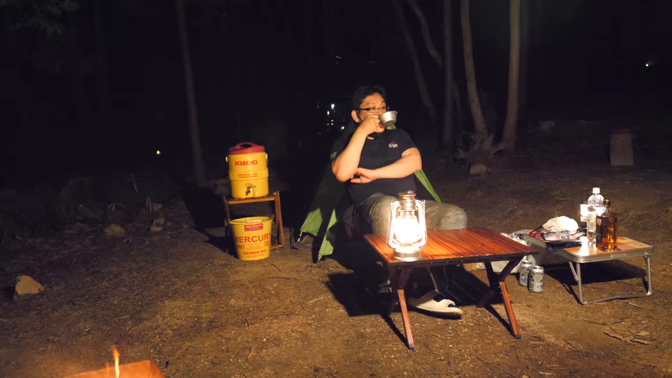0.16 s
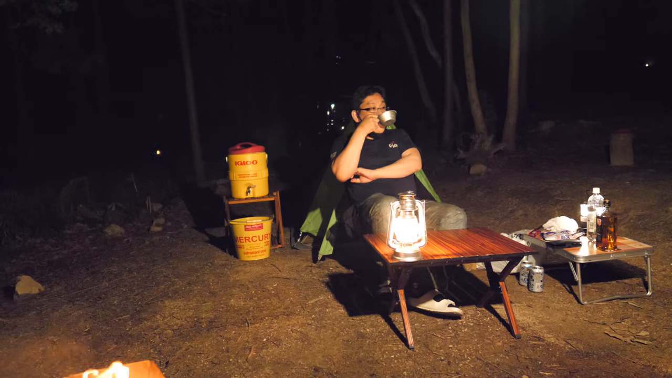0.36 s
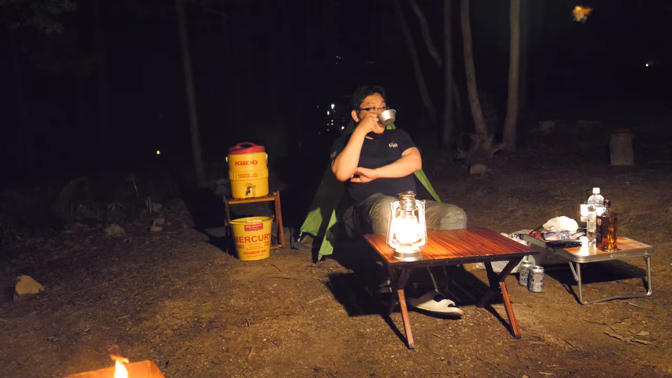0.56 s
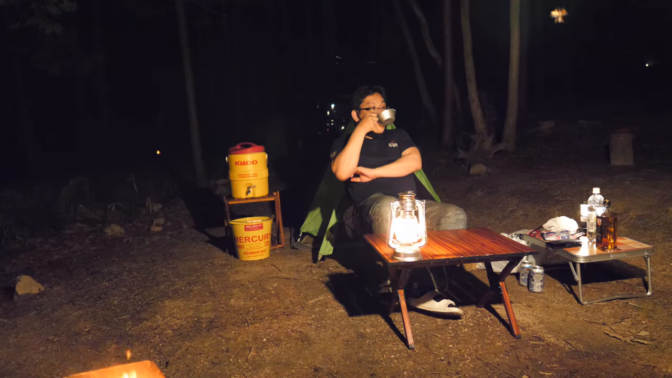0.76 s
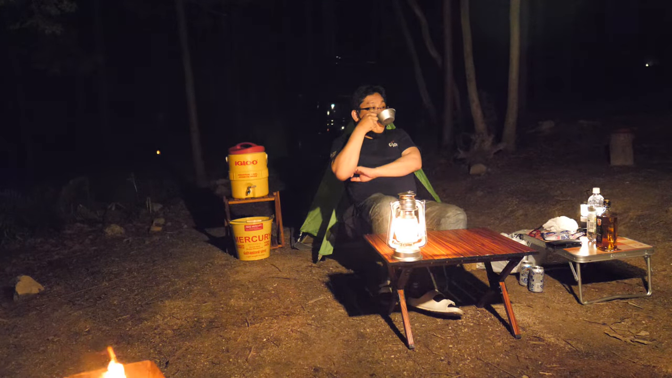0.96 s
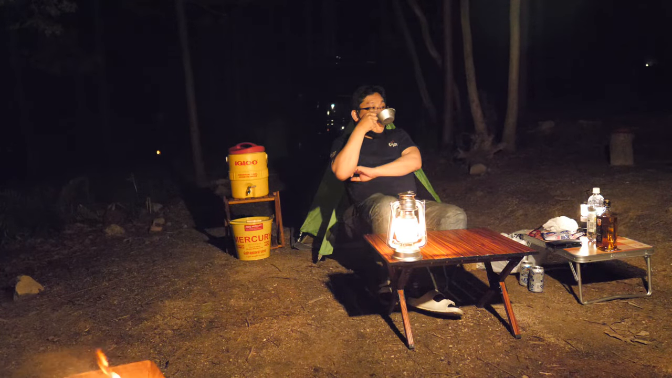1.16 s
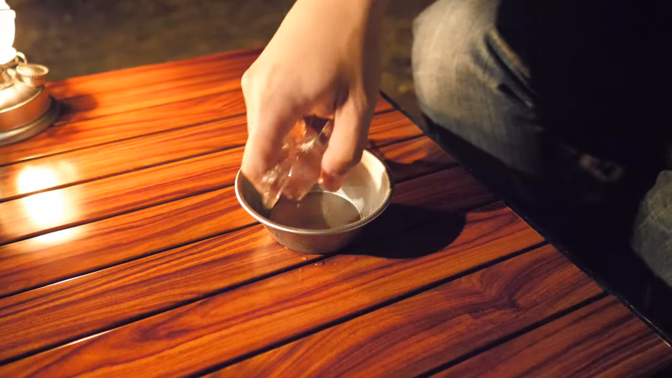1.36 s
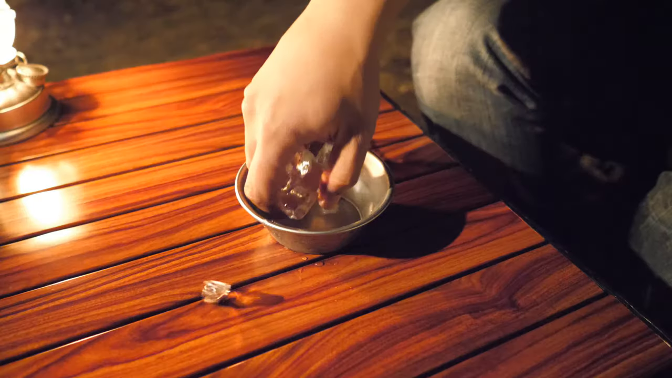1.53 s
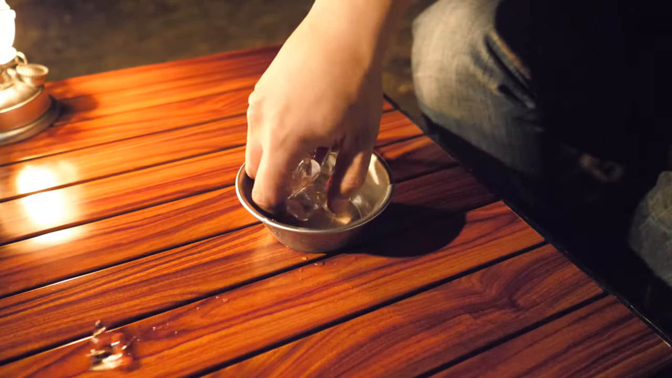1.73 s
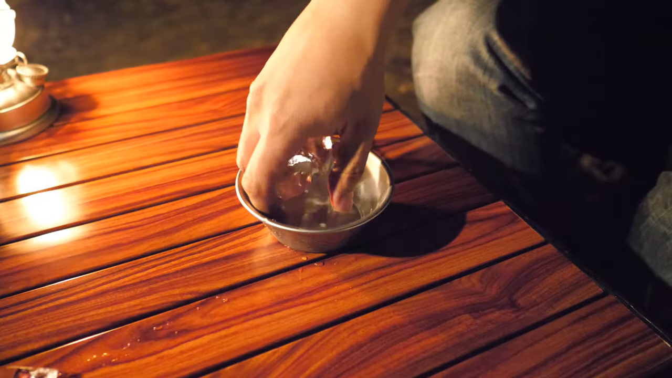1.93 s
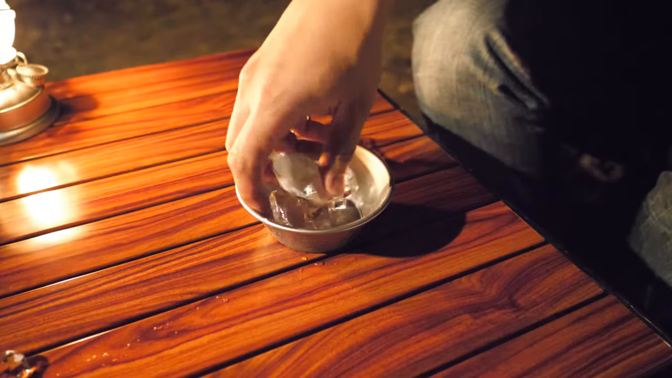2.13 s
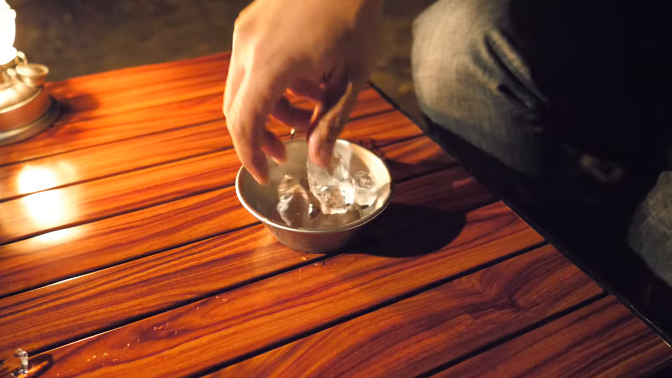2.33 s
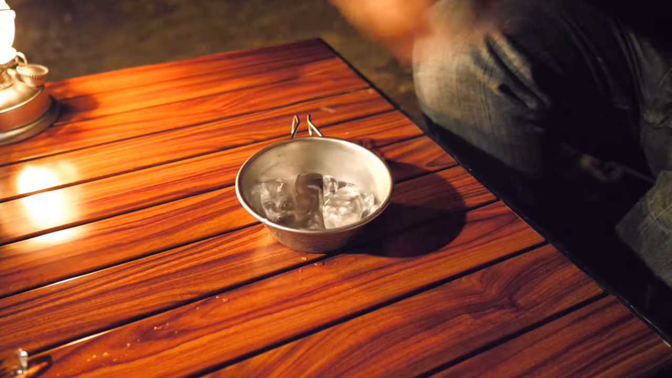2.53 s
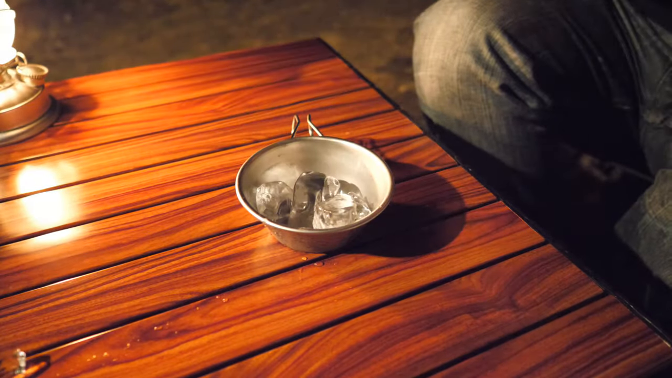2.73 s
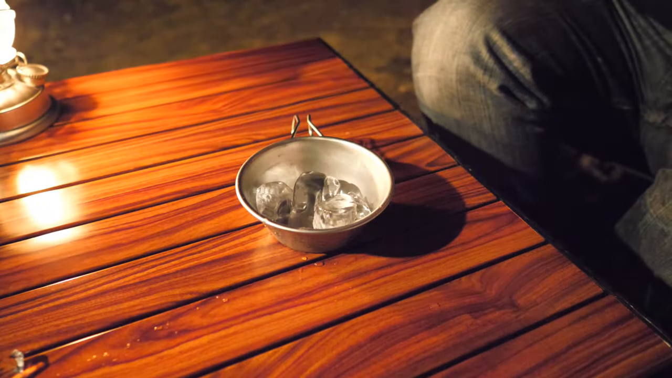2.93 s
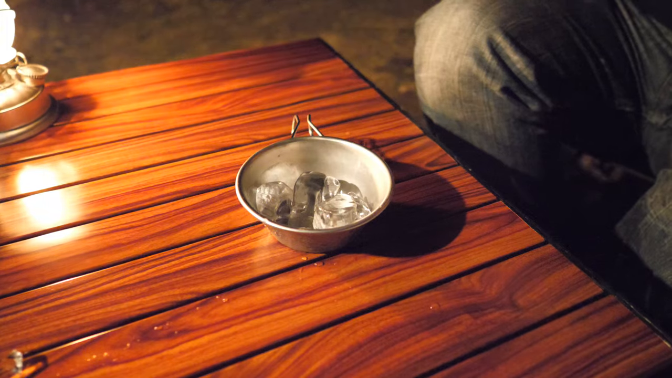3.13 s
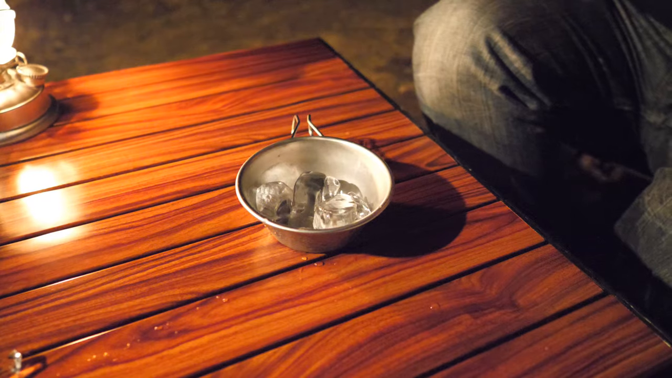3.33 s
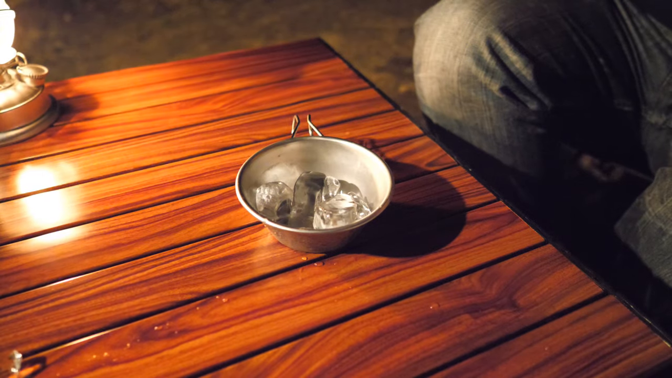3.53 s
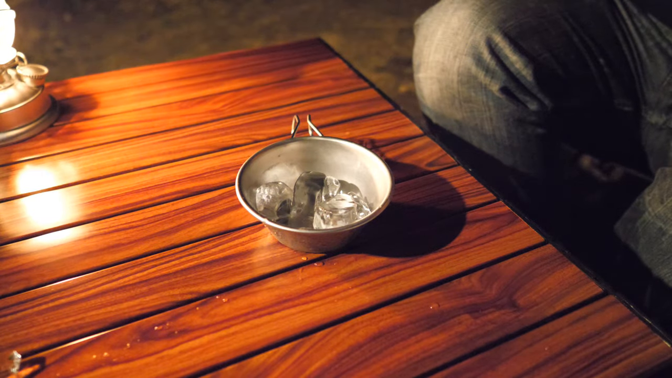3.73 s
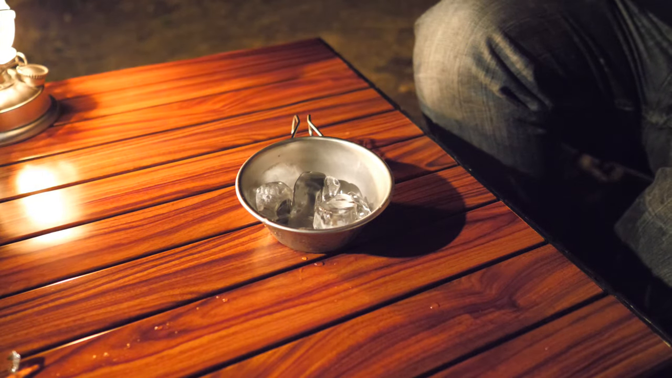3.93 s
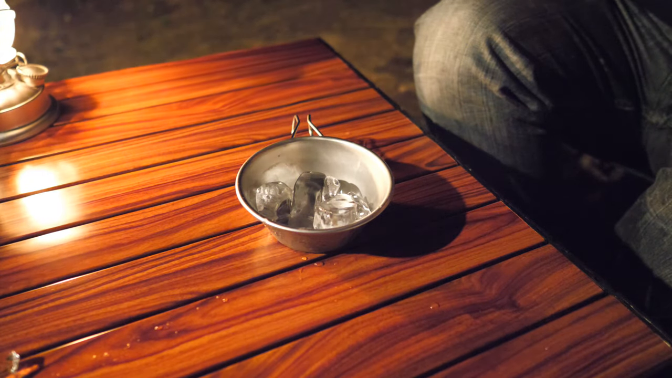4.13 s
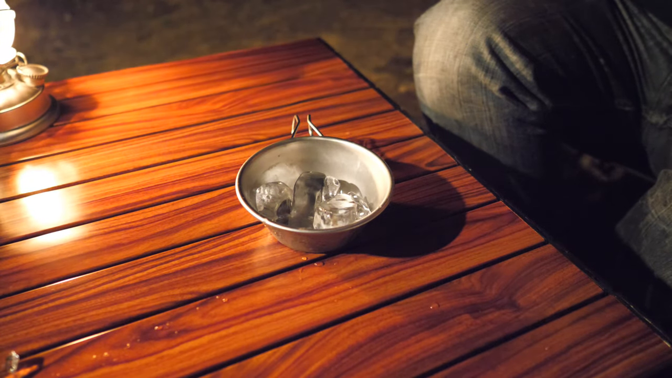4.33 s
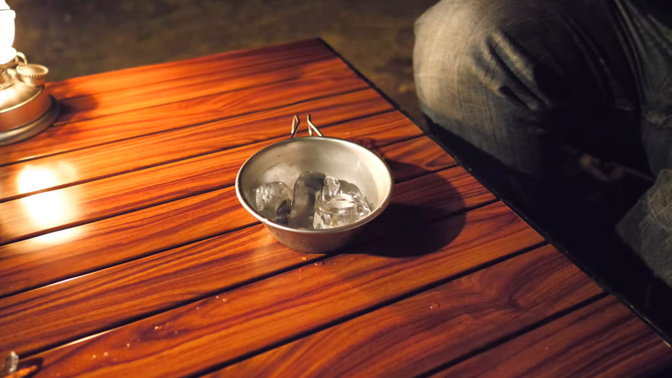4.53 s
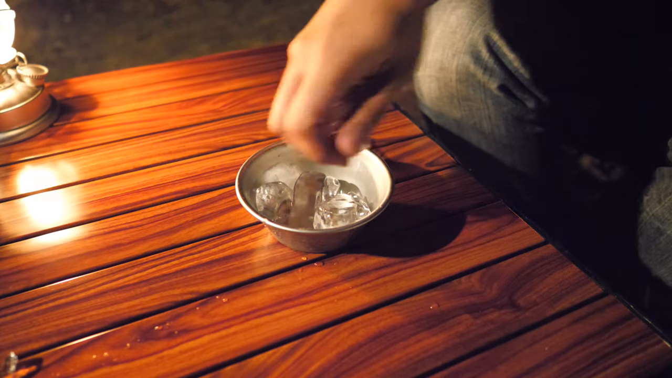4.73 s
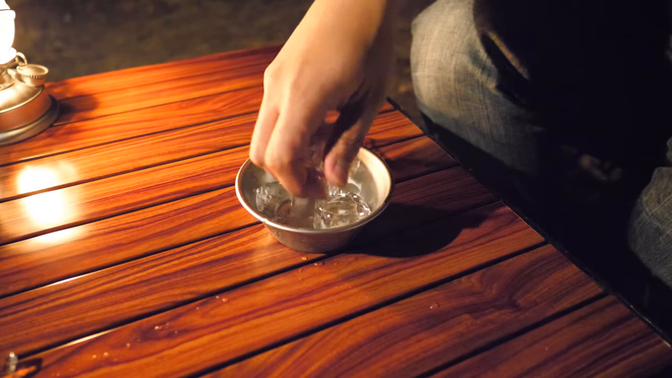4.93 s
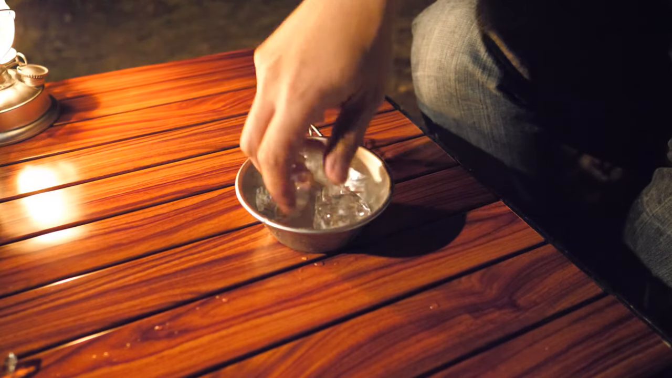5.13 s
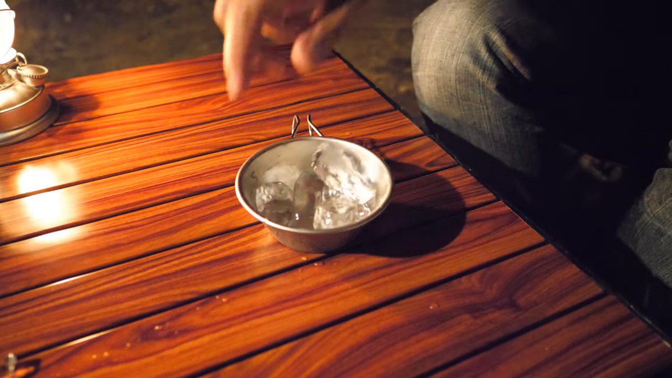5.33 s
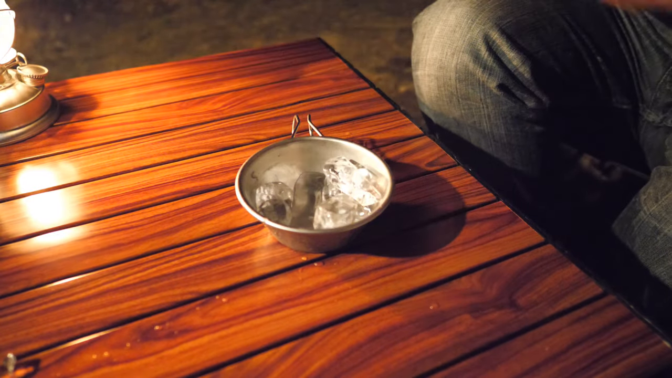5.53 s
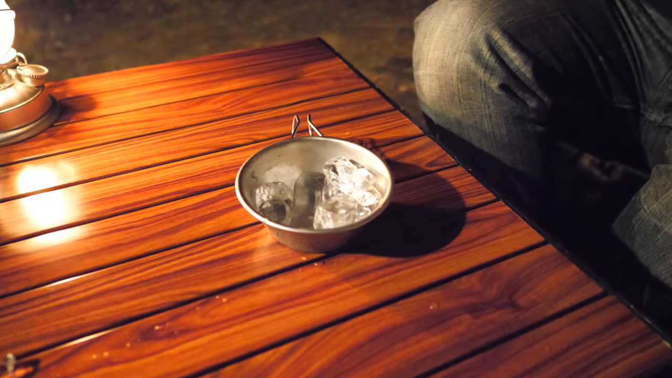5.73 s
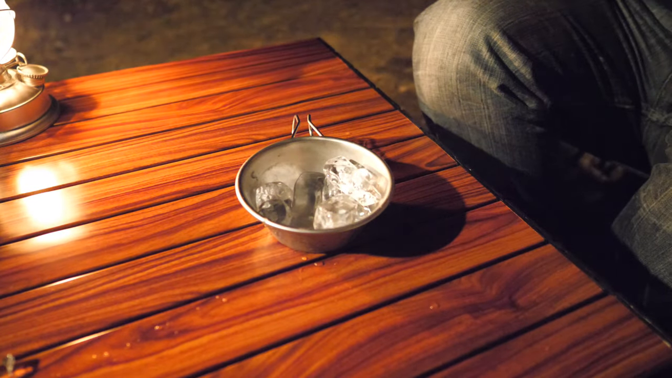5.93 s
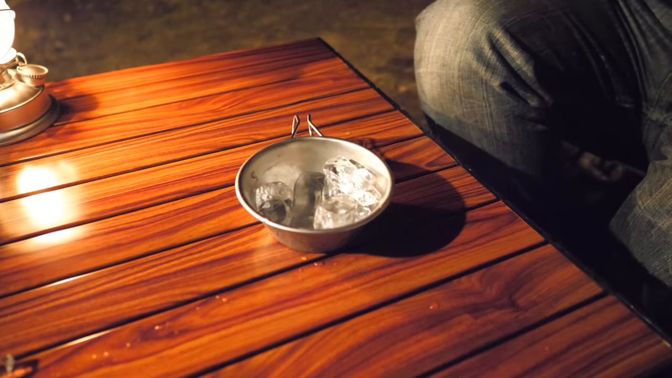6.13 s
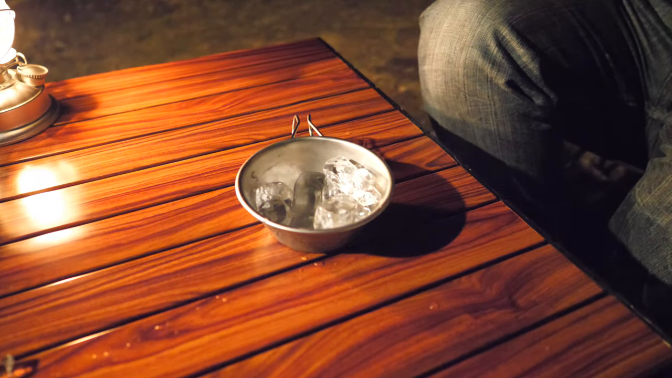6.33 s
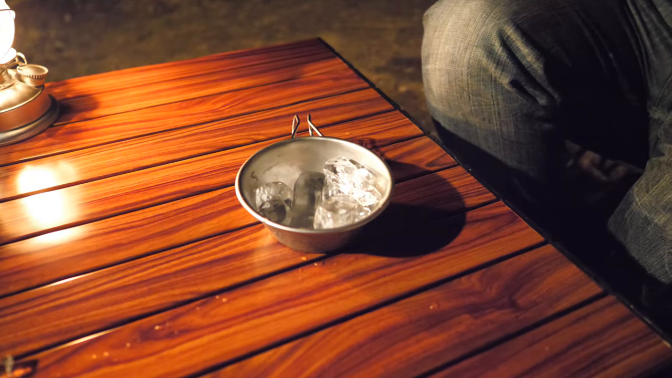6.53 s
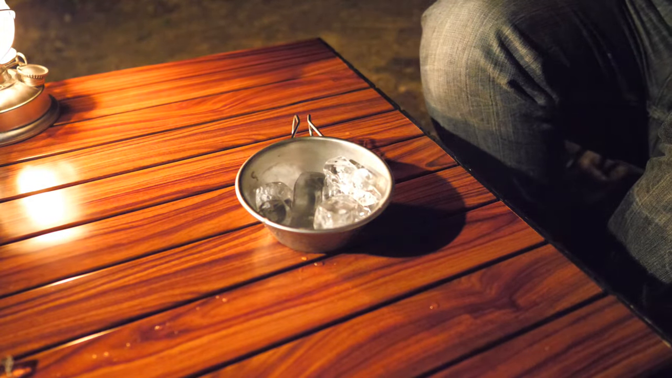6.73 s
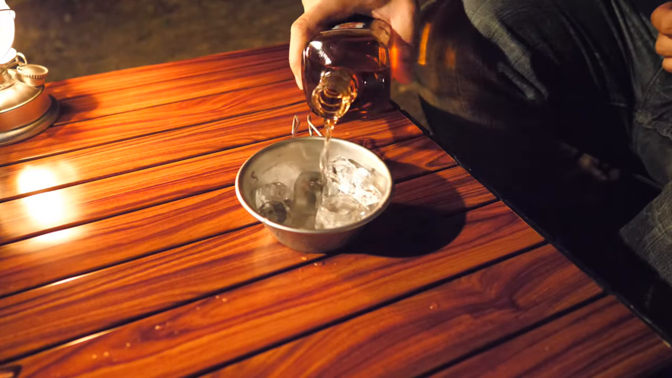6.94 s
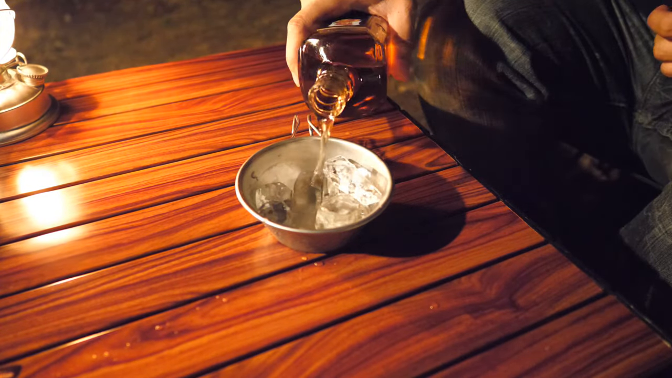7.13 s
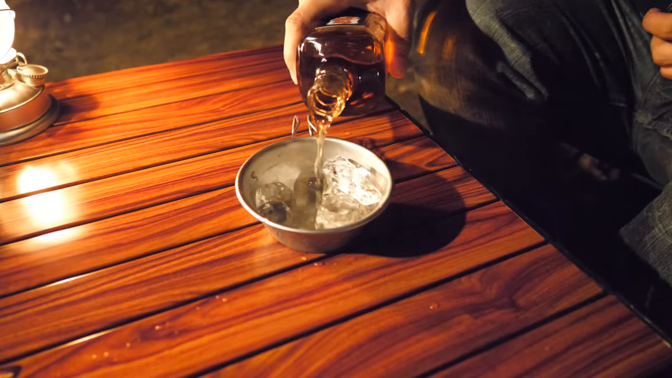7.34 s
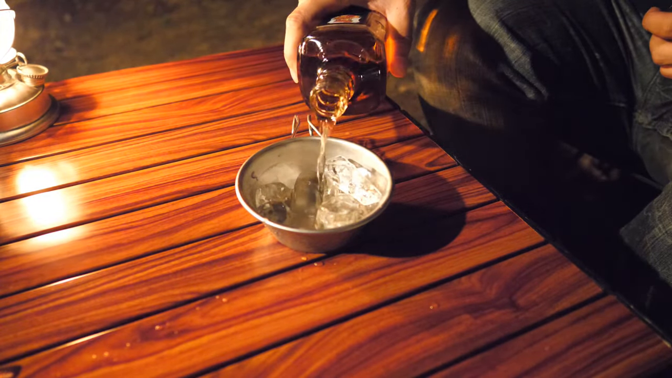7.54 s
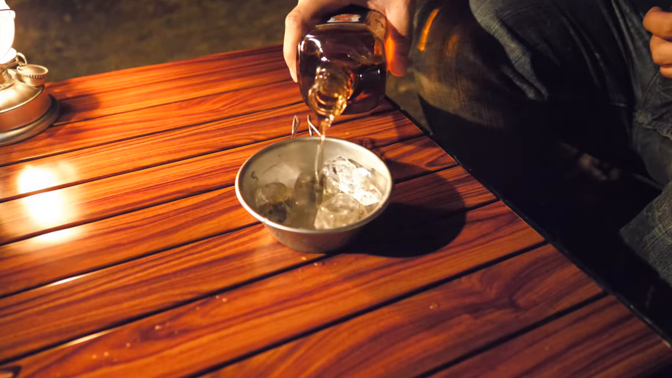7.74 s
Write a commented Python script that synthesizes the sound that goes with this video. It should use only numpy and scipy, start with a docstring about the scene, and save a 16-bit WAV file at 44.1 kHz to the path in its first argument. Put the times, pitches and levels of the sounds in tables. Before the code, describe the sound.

Ice cubes clang into a bare steel cup, knock and scrape together, then a plastic bag rustles, more ice drops, and faint drips plink at a quiet night camp.

```python
"""Camp in the woods at night: a hand drops ice cubes into a steel cup on a slatted wooden table and pushes them about.
The first cubes ring the bare cup (decaying modes); later ones knock, scrape and crack (noise bursts, grains, pings).
Between and after the handfuls a plastic ice bag rustles (grains and noise under hand strokes, snaps, gliding swishes).
Last a drink drips on the ice (pings). A campfire ticks faintly over steady hiss and low rumble (coloured noise)."""
import sys
import numpy as np
from scipy import signal
from scipy.fft import rfft, irfft, next_fast_len
from scipy.io import wavfile
from scipy.ndimage import uniform_filter1d, map_coordinates

SR = 44100
rng = np.random.default_rng(int(sys.argv[2]) if len(sys.argv) > 2 else 0)


def file_out(sig):
    """Save sig as 16-bit WAV at sys.argv[1]."""
    # one column per channel
    cols = np.atleast_2d(sig).T
    # limit, then scale
    lim = np.clip(cols, -1, 1)
    pcm = np.round(lim * 32767).astype(np.int16)
    wavfile.write(sys.argv[1], SR, pcm)


N = 343098
TIME_S = np.arange(N) / SR

# cube lands or is knocked: (time [s], force [dB], hardness as treble over bass [dB], cup ring over force [dB])
KNOCKS = [(1.4182, -12.5, 4.5, -5.5), (1.4534, -13.5, 27.5, 0), (1.5239, -6, 7, -5.5),
          (1.5393, -21.5, 8, 5.5), (1.6314, -18.5, -2, 2.5), (1.66, -18, -5, 1), (1.7005, -14.5, -8.5, -7),
          (1.7636, -34, -20.5, 5), (1.8244, -32.5, -18.5, -4), (1.8578, -28, -17, -10),
          (1.8838, -20.5, -17, -16), (1.9367, -9, -6.5, -20), (1.9683, -13, -10, -17),
          (1.9728, -12, -1, -37), (1.9907, -19.5, -9, -13), (2.0039, -16, -8, -24), (2.1126, -27, -13, 2.5),
          (2.121, -4.5, 4, -12), (2.164, -19.5, -8, -13), (2.2207, -24, -2, -30), (2.2674, -24.5, -14, -51),
          (2.292, -19.5, -11, -5), (2.3107, -17, 12, -3), (2.3199, -17, -14.5, -7),
          (2.3553, -20.5, -9, -19), (2.39, -42, -26, -18), (2.415, -17.5, 8, -3), (2.4258, -17.5, 10, -3),
          (2.4348, -7, -7.5, -35), (2.4602, -21.5, -9, -0.5), (2.496, -20.5, 17, -0.5),
          (2.5195, -8.5, -4, -7), (2.5391, -18.5, 17, -7), (2.576, -18, -5, -5), (2.599, -27, -9, -22),
          (5.013, -39.5, -17, -33), (5.0663, -7.5, 1.5, -29), (5.0826, -24.5, -10, -7),
          (5.1522, -24, -15, -6), (5.164, -21, -8, -10), (5.1762, -4.5, 1, -21), (5.1867, -12.5, 5, -9.5),
          (5.2044, -12.5, -6, -13), (5.2487, -11.5, 10, -13), (5.258, -9, 15, -8), (5.3064, -20, 5, -6),
          (5.317, -14.5, 18, -21), (5.336, -24.5, -10, -24), (5.358, -16, -8, -48), (5.362, -24, -3, -47),
          (5.3932, -20, -4, 5.5), (5.3978, -7.5, 12, -9), (5.4805, -16.5, 13, -17), (5.507, -36.5, -15, -6)]
# cup modes: (frequency [Hz], unloaded t60 [s], level struck on rim [dB], on bare base [dB],
# on wall with ice inside [dB], when heaped with ice [dB])
CUP_MODES = [(294, 0.11, -36, -27, -34, -33), (653, 0.16, -19, -1, -9, -33), (698, 0.14, -28, -10, -6, -20),
             (1110, 0.26, -6, -5, -11, -9), (1253, 0.29, -4, -6, -35, -30),
             (1570, 0.18, -25, 8.5, -24, -24), (1733, 0.081, -27, -3, 2.5, -12),
             (2160, 0.24, -6, -9, -3, 12), (2353, 0.081, -33, -30, 1, 9.5), (2690, 0.13, -23, -7, -31, -14),
             (2870, 0.14, -26, 1.5, -6, -17), (2940, 0.31, -8, -10, -36, -1),
             (3860, 0.38, -18, -32, -5.5, -18), (4600, 0.21, 9, 1.5, -6, -14),
             (5100, 0.22, -14, -3, -25, 9.5), (5459, 0.29, -1, -28, -14, -15),
             (6520, 0.087, 15, -26, -21, -22), (7000, 0.22, -13, -21, -8, -20),
             (7000, 0.2, -25, -21, -33, -26), (8100, 0.052, 18, -16, -10, -25),
             (10760, 0.045, 5, -33, -2, -29)]
# cup fills up: start of blows on the base, on the wall, on the heap (time [s])
FILLING = [1.5, 1.8, 4.0]
# colour of a blow on cup and table: (frequency [Hz], density [dB per Hz])
BODY = [(120, -33), (190, -27), (270, -2), (480, -8.5), (640, -0.5), (870, 1), (1000, -6), (1700, -3.5),
        (2600, -8), (4600, -8.5), (6000, -11), (7600, -9), (10000, -16), (11800, -12.5), (15500, -19.5)]
# cubes are shoved, rock and scrape: (time [s], length [s], rocking [dB], scraping [dB])
SHOVES = [(1.667, 0.081, -26.5, -32), (1.753, 0.035, -32, -69.5), (1.891, 0.035, -19.5, -39),
          (1.948, 0.072, -22, -43), (2.056, 0.05, -34.5, -68), (2.129, 0.026, -32, -18.5),
          (2.316, 0.022, -21, -21.5), (2.41, 0.052, -33, -37), (2.479, 0.11, -30.5, -26),
          (5.131, 0.035, -31, -45), (5.179, .04, -21.5, -27), (5.442, .02, -33, -54)]
# warming ice splits: (time [s], level [dB], frequency [Hz])
CRACKS = [(2.0541, -10.5, 3180), (2.097, -35, 3270), (2.1069, -19.5, 3340), (2.2188, -15.5, 3340),
          (2.6891, -10, 3680), (4.9788, -22, 3500)]
# hand grips the bag: (time [s], length [s], level [dB], brightness [dB])
GRIPS = [(2.705, 0.13, -31, -4), (2.796, 0.12, -32, 0), (2.969, 0.098, -32.5, -1.5),
         (3.089, 0.15, -34, 0.5), (3.242, 0.2, -29.5, -1.5), (3.45, 0.1, -35, -3.5),
         (3.529, .35, -33, -3.5), (3.894, 0.23, -35, -2.5), (4.112, 0.26, -35, -0.5),
         (5.717, 0.21, -36.5, -14.5), (5.964, 0.097, -32.5, -15.5), (6.06, 0.54, -39.5, -12.5),
         (6.386, .1, -26, -2), (6.606, 0.2, -33.5, -4)]
# bag creases snap: (time [s], level [dB], brightness [dB])
SNAPS = [(2.7747, -22, 4), (2.8087, -24, 0), (2.8476, -25, 5), (2.913, -22.5, 8), (2.931, -27, 7),
         (2.9595, -28.5, 7), (3.0494, -15, -0.5), (3.1657, -23.5, -4), (3.236, -25, 6), (3.3213, -15, 19),
         (3.4176, -30.5, -13.5), (3.5446, -28, 16), (3.6011, -24.5, 1), (3.756, -21, 14.5),
         (4.0153, -23, 5), (4.0759, -35, -17), (5.7498, -21.5, 2), (5.798, -24.5, 0), (5.911, -18, -7),
         (5.985, -22.5, -0.5), (6.2336, -25.5, -2), (6.401, -24.5, 17), (6.4086, -25, -11.5),
         (6.5227, -20, 4), (6.5392, -21.5, -4.5), (6.6221, -22.5, 1), (6.7279, -27, 28.5),
         (6.7686, -24.5, -7.5)]
# film drawn over wet ice: (time [s], length [s], first frequency [Hz], last frequency [Hz], level [dB])
SWISHES = [(3.567, 0.063, 5220, 4230, -26.5), (3.653, .08, 2820, 2050, -29.5),
           (6.623, 0.17, 2290, 4680, -33.5)]
# colour of the plastic film: (frequency [Hz], density [dB per Hz])
FILM = [(88, -44), (150, 5.5), (534, -4.5), (649, -4.5), (941, 0.5), (1600, 1), (4760, -5), (6770, -16),
        (7920, -15), (13400, -21.5), (16000, -22)]
# poured drink plinks on the ice: (time [s], level [dB], frequency [Hz])
DRIPS = [(7.6496, -32, 3380), (7.6785, -24, 3430), (7.679, -32, 5060), (7.7656, -29.5, 1870)]
# fire ticks: (time [s], level [dB], frequency [Hz])
FIRE_TICKS = [(0.8859, -32.5, 5360), (7.0342, -41.5, 6650), (7.4273, -43, 8250), (7.6181, -44, 9100),
              (7.7114, -44, 8160)]
# colour of the flames: (frequency [Hz], density [dB per Hz])
FLAMES = [(300, -15.5), (600, -1), (850, -4), (1200, -9), (7000, -41), (8700, -20.5), (10000, -57)]
# colour of the woods' hiss: (frequency [Hz], density [dB per Hz])
WOODS = [(100, 0.5), (250, -3), (380, -6.5), (700, -4), (2600, -5), (3200, -2), (3900, -7.5), (7000, -20.5),
         (11600, -29), (16000, -34)]
# low rumble: (time [s], level [dB])
RUMBLE = [(0.0, -62), (0.06, -46), (1.28, -48.5), (1.34, -40), (1.6, -50), (1.65, -45), (4.79, -50.5),
          (5.55, -55), (6.2, -41.5), (6.78, -55), (6.85, -41), (7.04, -50.5), (7.71, -44), (7.78, -56)]
# brief dropouts: (start [s], end [s])
DIPS = [(1.205, 1.219), (6.807, 6.822)]

HEAP_CLINK_DB, HEAP_CUSHION_DB = 4.5, 2.5  # ice on ice: more clink, less thud
# tail level: base, then dB per dB; ringing steel dies slowly, weak blows chatter, hard ones bounce clear
TAIL_DB, TAIL_PER_RING, TAIL_PER_FORCE, TAIL_PER_HARDNESS = -12, 0.66, -0.79, -0.2
DAMPED_HZ, DAMPED_T60_S = 5000, 0.12  # the extra damping alone gives this t60 at this frequency
HISS_DB, FLAMES_DB, FLAMES_END_S = -41.5, -45.5, 1.21
BUMP_S, BUMP_DB = 6.84, -40.5
GAIN_THRESHOLD_DB, GAIN_SLOPE = -14.5, 0.5  # slope: dB of gain cut per dB over threshold
HELD_LEVEL_FALL_DB_PER_S = 25
CLIP_LEVEL, TOP_HZ, SKIRT_HZ = 1.05, 15900, 600


def amp(db):
    """Decibels to gain."""
    return 10 ** (np.asarray(db) / 20)


def unit(x):
    """Scale to rms 1."""
    return x / np.sqrt(np.mean(x ** 2) + 1e-20)


def colour(points, hz):
    """Gain of (Hz, dB) points, interpolated on a log frequency axis."""
    points_hz, db = np.transpose(points)
    return amp(np.interp(np.log(hz + 1), np.log(points_hz), db))


def band(hz, lo_hz, hi_hz):
    """Gain of a steep band-pass."""
    return 1 / np.sqrt((1 + (lo_hz / (hz + 1)) ** 10) * (1 + (hz / hi_hz) ** 10))


def filtered(x, points, lo_hz, hi_hz):
    """Colour a sound within a band, rms 1."""
    m = next_fast_len(len(x))
    hz = np.fft.rfftfreq(m, 1 / SR)
    spectrum = rfft(x, m) * colour(points, hz) * band(hz, lo_hz, hi_hz)
    return unit(irfft(spectrum, m)[:len(x)])


def noise(points, lo_hz, hi_hz, size=N):
    """Coloured noise of rms 1 within a band."""
    return filtered(rng.standard_normal(size), points, lo_hz, hi_hz)


def wobble(knots_per_s):
    """Smooth random curve."""
    knots = rng.standard_normal(int(N * knots_per_s / SR) + 4)
    return map_coordinates(knots, [TIME_S * knots_per_s])


def fade(t, t60):
    """Free exponential decay, 60 dB in t60."""
    return np.exp(-np.log(1000) * t / t60)


def add(out, s, sound):
    """Mix a sound in at a time."""
    part = out[max(round(s * SR), 0):][:len(sound)]
    part += sound[:len(part)]


def burst(points, lo_hz, hi_hz, t60, tail_db, tail_t60):
    """Blow on densely packed modes: noise with a sharp front and a tail, rms 1 over the first 5 ms."""
    t = np.arange(SR // 5) / SR
    decay = fade(t, t60) + amp(tail_db) * fade(t, tail_t60)
    onset = 1 - np.exp(-t * hi_hz * 2)
    x = noise(points, lo_hz, hi_hz, size=len(t)) * decay * onset
    return x / np.sqrt(np.mean(x[:SR // 200] ** 2))


def grains(rate, lo_hz, hi_hz, cycles, spread_db):
    """Many tiny contacts (rate per second), each ringing a few cycles at its own pitch; rms 1."""
    when, pitch, size, sign = rng.random((int(rate * N / SR), 4)).T[:, :, None]
    hz = lo_hz * (hi_hz / lo_hz) ** pitch
    n = np.arange(SR // 100)
    size_db = spread_db * np.minimum(-np.log(1 - size), np.pi)
    strength = amp(size_db) * np.sign(sign - 0.5) * hz
    ring = strength * np.sin(2 * np.pi * hz * n / SR) * fade(n / SR, cycles / hz)
    position = (when * N).astype(int) + n
    return unit(np.bincount(position.ravel(), ring.ravel(), N)[:N])


def stroke(s, length, attack_s, sag_db_per_s, release_t60):
    """Envelope of a hand movement: takes hold, drifts in strength, lets go."""
    t = np.maximum(TIME_S - s, 0)
    hold = np.minimum(t / attack_s, 1) * amp(-sag_db_per_s * t)
    return hold * fade(np.maximum(t - length, 0), release_t60)


def pings(rows, t60, spray_db, tail_db):
    """Each event rings one tone for a few cycles, with a spray of treble."""
    out, t = np.zeros(N), np.arange(SR // 5) / SR
    for s, db, hz in rows:
        tone = np.sin(2 * np.pi * hz * t) * fade(t, t60) * (1 - np.exp(-t * hz))
        tone /= np.sqrt(np.mean(tone[:3 * SR // 1000] ** 2))
        spray = burst(BODY, hz / 2, 16000, t60=0.0048, tail_db=tail_db, tail_t60=0.04)
        add(out, s, amp(db) * (tone + amp(spray_db) * spray))
    return out


def small(x, corner_hz):
    """Small things radiate little bass."""
    return signal.sosfilt(signal.butter(2, corner_hz, "highpass", fs=SR, output="sos"), x)


def knocks():
    """Contacts thump table, clack cup, snap in ice; lower fronts last longer, harder blows are brighter."""
    out = np.zeros(N)
    for s, db, hard_db, ring_db in KNOCKS:
        heaped = s > FILLING[-1]
        tail_db = TAIL_DB + TAIL_PER_RING * ring_db + TAIL_PER_FORCE * db + TAIL_PER_HARDNESS * hard_db
        thud_db = db - 0.54 * hard_db - heaped * HEAP_CUSHION_DB - 5
        clack_db = db - 0.28 * hard_db - 6.5
        clink_db = db + 0.13 * hard_db - 0.11 * ring_db + heaped * HEAP_CLINK_DB - 5
        crack_db = db + 0.49 * hard_db + 0.38 * ring_db - 3.5
        thud = burst(BODY, 220, 1540, t60=0.047, tail_db=tail_db - 1.5, tail_t60=0.15)
        clack = burst(BODY, 1340, 2740, t60=0.022, tail_db=tail_db - 1, tail_t60=0.14)
        clink = burst(BODY, 2190, 4800, t60=0.011, tail_db=tail_db - 3, tail_t60=0.089)
        crack = burst(BODY, 5300, 19000, t60=0.011, tail_db=tail_db + 7, tail_t60=0.068)
        add(out, s, amp(thud_db) * thud)
        add(out, s, amp(clack_db) * clack)
        add(out, s, amp(clink_db) * clink)
        add(out, s, amp(crack_db) * crack)
    return out


def cup_ring(scatter_db, ring_db):
    """Where a cube lands decides which modes of the steel sound."""
    out, t = np.zeros(N), np.arange(SR // 3) / SR
    hz, t60, *places = np.transpose(CUP_MODES)
    for s, db, _, steel_db in KNOCKS:
        place = np.searchsorted(FILLING, s)
        loaded = place > 1
        size = amp(places[place] + scatter_db * rng.standard_normal(len(hz)))
        size /= np.linalg.norm(size)
        # once the cup is loaded, high modes are damped most and all detune a little from blow to blow
        pitch = hz * (1 + 0.0062 * loaded * rng.standard_normal(len(hz)))
        life = 1 / (1 / t60 + loaded * (hz / DAMPED_HZ) ** 2 / DAMPED_T60_S)
        phase = 2 * np.pi * (pitch[:, None] * t + rng.random((len(hz), 1)))
        # the handle spoils the symmetry: each mode has a weaker twin that beats with it
        detune = 1 + 0.0102 * rng.standard_normal((len(hz), 1))
        twin = np.sin(phase * detune) / 2
        modes = (np.sin(phase) + twin) * fade(t, life[:, None])
        add(out, s, amp(db + steel_db + ring_db) * size @ modes)
    return out


def cube_ring(cube_db, t60, lo_hz, hi_hz):
    """No two cubes alike: each contact briefly rings 8 random modes, the high ones more on a hard blow."""
    out, t = np.zeros(N), np.arange(SR // 8) / SR
    for s, db, hard_db, _ in KNOCKS:
        height, phase = rng.random((2, 8, 1))
        hz = lo_hz * (hi_hz / lo_hz) ** height
        size = amp(db + cube_db - 5.5 * height + 0.7 * hard_db * (height - 0.5))
        modes = size * np.sin(2 * np.pi * (hz * t + phase)) * fade(t, t60)
        add(out, s, np.sum(modes, axis=0))
    return out


def jostle(clatter_db, grit_db, table_db):
    """Shoved cubes rock in runs of small knocks, their edges scrape, the table murmurs under the load."""
    rocking, scraping = np.zeros((2, N))
    for s, length, rock_db, scrape_db in SHOVES:
        push = stroke(s, length, attack_s=0.0051, sag_db_per_s=13, release_t60=0.048)
        rocking += amp(rock_db) * push
        scraping += amp(scrape_db) * push
    rocks = grains(rate=600, lo_hz=610, hi_hz=2880, cycles=18, spread_db=1.5)
    edges = grains(rate=690, lo_hz=2460, hi_hz=15000, cycles=10, spread_db=-4.5)
    clatter = amp(clatter_db) * filtered(rocks, BODY, 220, 3300)
    grit = amp(grit_db) * filtered(edges, BODY, 2500, 18000)
    table = amp(table_db) * noise([(85, 6), (130, -15.5), (220, -3)], 87, 280)
    return rocking * (clatter + table) + scraping * grit


def cracks():
    """Warming ice splits: a very short ping with a treble spray."""
    return pings(CRACKS, t60=0.003, spray_db=-22, tail_db=20)


def bag(fold_db, crinkle_db, sizzle_db, flap_db):
    """Film crinkles in dense grains over a smooth rub; taut film sizzles, slack film folds and flaps."""
    flaps, folds, crinkle, sizzle = np.zeros((4, N))
    for s, length, db, bright_db in GRIPS:
        grip = amp(db) * stroke(s, length, attack_s=0.013, sag_db_per_s=-2.5, release_t60=0.066)
        flaps += grip * amp(-1.1 * bright_db)
        folds += grip * amp(-0.4 * bright_db)
        crinkle += grip
        sizzle += grip * amp(2.7 * bright_db)
    film = grains(rate=1500, lo_hz=400, hi_hz=12000, cycles=4, spread_db=5)
    film += rng.standard_normal(N) / 2
    film *= amp(0.45 * wobble(50) + 0.53 * wobble(300))  # grip catches and lets go in flurries
    taut = rng.standard_normal(N) + 0.55 * unit(film)
    out = amp(flap_db) * flaps * filtered(film, FILM, 236, 536)
    out += amp(fold_db) * folds * filtered(film, FILM, 400, 1620)
    out += amp(crinkle_db) * crinkle * filtered(film, FILM, 2250, 8400)
    out += amp(sizzle_db) * sizzle * filtered(taut, FILM, 4360, 23000)
    return out


def snaps():
    """A crease snaps through: a slack one pops, a taut one ticks."""
    out = np.zeros(N)
    for s, db, bright_db in SNAPS:
        pop = burst(FILM, 350, 1170, t60=0.028, tail_db=-14, tail_t60=0.038)
        snap = burst(FILM, 1550, 7900, t60=0.011, tail_db=-12, tail_t60=0.041)
        tick = burst(FILM, 4900, 13400, t60=0.006, tail_db=-8, tail_t60=0.046)
        add(out, s, amp(db - 6.5 - 0.96 * bright_db) * pop)
        add(out, s, amp(db + 1.5) * snap)
        add(out, s, amp(db - 11 + 0.53 * bright_db) * tick)
    return out


def swishes(knots_per_s):
    """A narrow band of friction noise swells and fades while its pitch glides with the pull on the film."""
    out = np.zeros(N)
    for s, length, first_hz, last_hz, db in SWISHES:
        progress = np.clip((TIME_S - s) / length, 0, 1)
        hz = first_hz + (last_hz - first_hz) * progress
        carrier = np.exp(2j * np.pi * np.cumsum(hz) / SR)
        wander = wobble(knots_per_s) + 1j * wobble(knots_per_s)  # sets the bandwidth
        out += amp(db) * np.sin(np.pi * progress) ** 2 * unit((carrier * wander).real)
    return out


def drips():
    """Poured drink plinks on the ice: short pings."""
    return pings(DRIPS, t60=0.019, spray_db=-14.5, tail_db=-20)


def bump():
    """Soft low bump before the pour: swelling low noise, no ring."""
    push = stroke(BUMP_S, 0.028, attack_s=0.013, sag_db_per_s=30, release_t60=0.19)
    return amp(BUMP_DB) * push * noise([(85, 4), (170, -12)], 70, 136)


def fire_ticks():
    """The fire ticks: pings of a few cycles with equal spray."""
    return pings(FIRE_TICKS, t60=0.0048, spray_db=0, tail_db=-3)


def flames():
    """Flames close by, at first only: steady coloured noise."""
    return amp(FLAMES_DB) * (TIME_S < FLAMES_END_S) * noise(FLAMES, 150, 12000)


def woods():
    """Hiss of the woods: coloured noise, slightly unsteady."""
    return amp(HISS_DB + 0.2 * wobble(6.9)) * noise(WOODS, 86, 19200)


def rumble():
    """Low stir of air: deep noise that rises and falls."""
    level_db = np.interp(TIME_S, *np.transpose(RUMBLE)) + 0.5 * wobble(11)
    return amp(level_db) * noise([(22, 5.5), (35, 6.5), (55, 4.5), (110, -13)], 19, 124)


def scene():
    """Ice and cup in front; bag, drink, fire and woods around."""
    ice = knocks() + cup_ring(scatter_db=5, ring_db=7)
    ice += cube_ring(cube_db=-10, t60=0.035, lo_hz=1510, hi_hz=13460)
    ice += jostle(clatter_db=0, grit_db=-2, table_db=-9.5)
    plastic = bag(fold_db=-7, crinkle_db=-3, sizzle_db=-7, flap_db=-25.5)
    plastic += snaps() + swishes(knots_per_s=900)
    background = fire_ticks() + flames() + woods() + rumble()
    return (small(ice + plastic, corner_hz=159) + cracks() + drips() + bump() + background)[None]


def gain_control(x):
    """Loud blows turn the gain down at once; it creeps back afterwards."""
    level_db = 10 * np.log10(np.abs(uniform_filter1d(x ** 2, size=220)) + 1e-12)
    # peak hold that falls at a constant rate
    fall_db = HELD_LEVEL_FALL_DB_PER_S * TIME_S
    held_db = np.maximum.accumulate(level_db + fall_db, axis=-1) - fall_db
    return x * amp(-GAIN_SLOPE * np.maximum(held_db - GAIN_THRESHOLD_DB, 0))


def record(dry):
    """Loud blows duck the gain and clip softly, sound drops out briefly twice, a low-pass limits the band."""
    live = 1.0 - sum((TIME_S > start) & (TIME_S < end) for start, end in DIPS)
    x = gain_control(dry) * uniform_filter1d(live, size=64)
    x = x / (1 + np.abs(x / CLIP_LEVEL) ** 6) ** (1 / 6)
    m = next_fast_len(N + SR // 10)
    hz = np.fft.rfftfreq(m, 1 / SR)
    low_pass = np.clip((TOP_HZ - hz) / SKIRT_HZ + 0.5, 0, 1)
    return irfft(rfft(x, m) * low_pass, m)[:, :N]


dry = scene()
out = record(dry)
file_out(out)
```